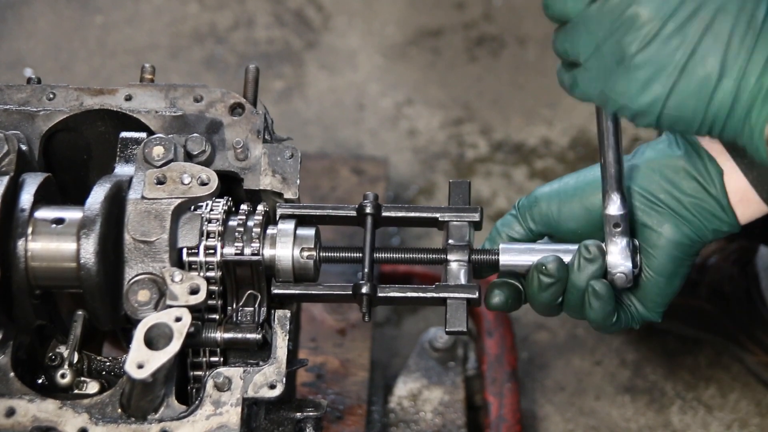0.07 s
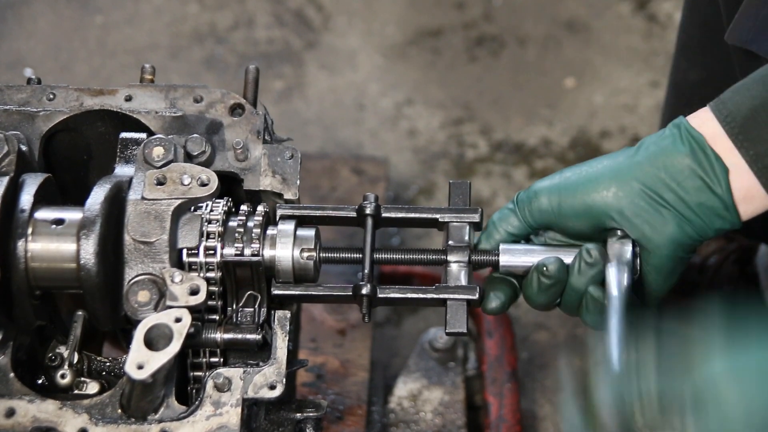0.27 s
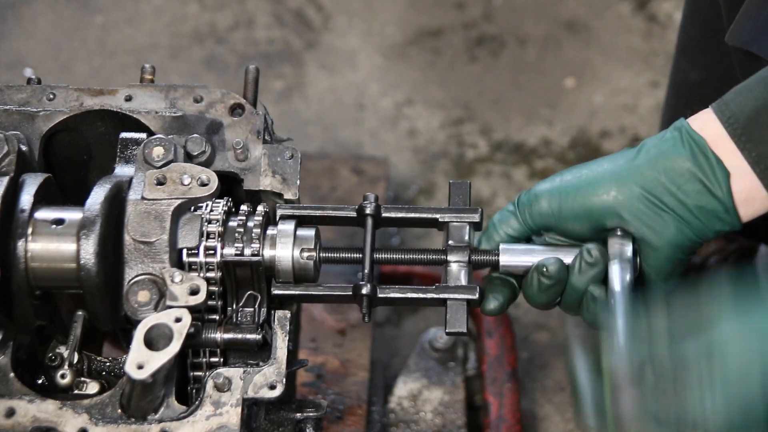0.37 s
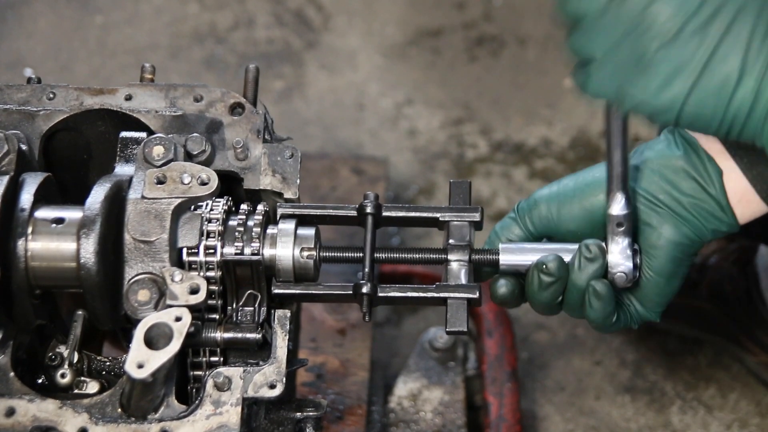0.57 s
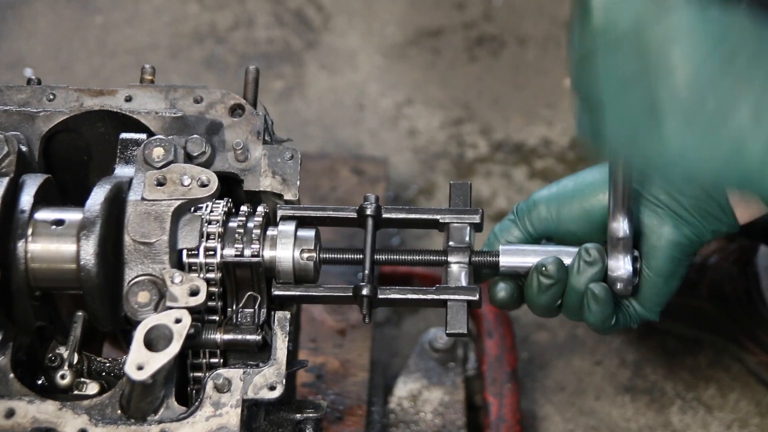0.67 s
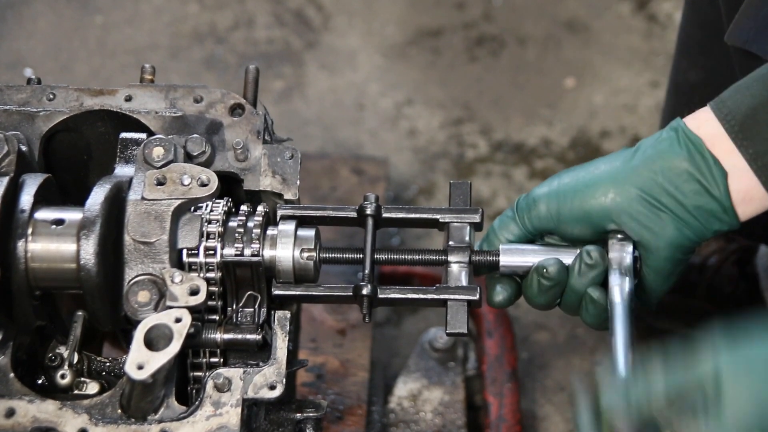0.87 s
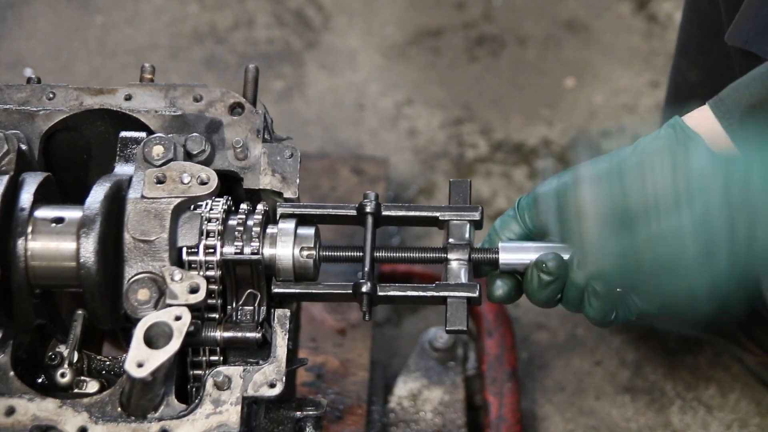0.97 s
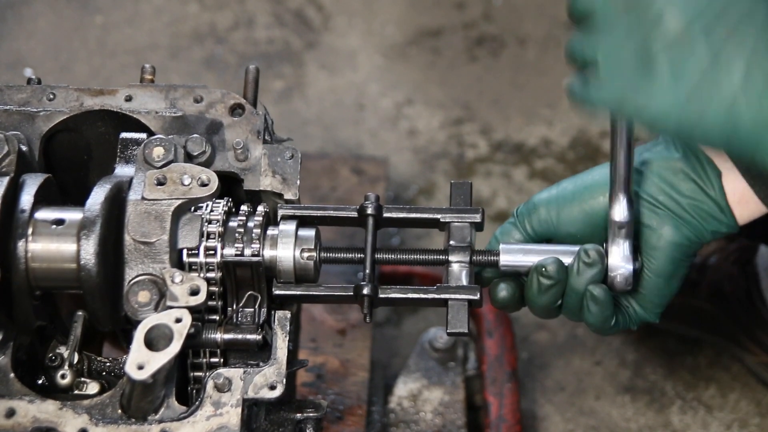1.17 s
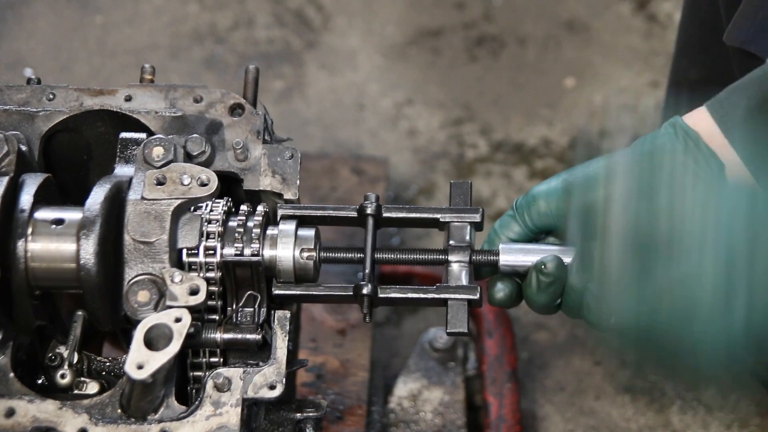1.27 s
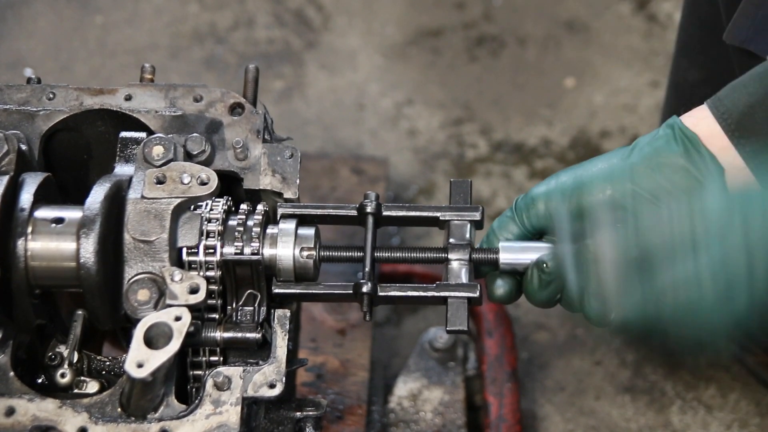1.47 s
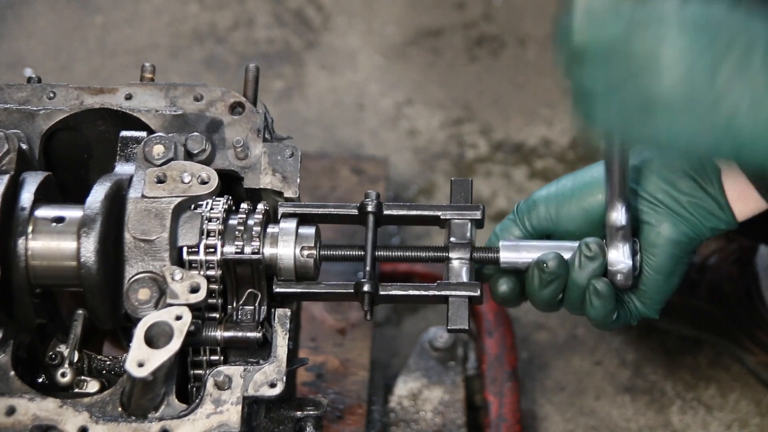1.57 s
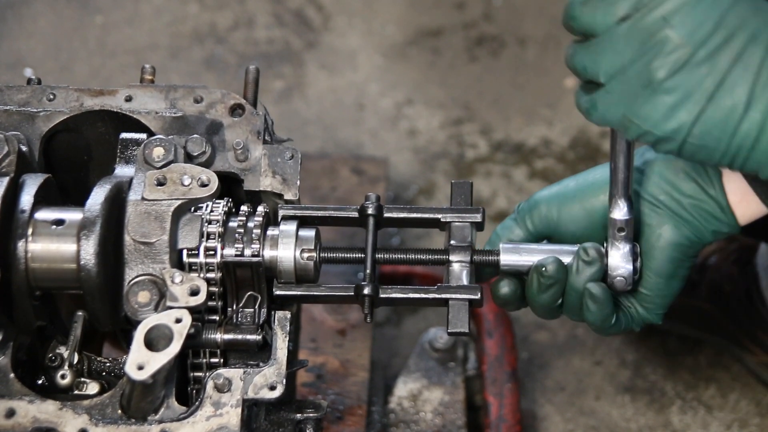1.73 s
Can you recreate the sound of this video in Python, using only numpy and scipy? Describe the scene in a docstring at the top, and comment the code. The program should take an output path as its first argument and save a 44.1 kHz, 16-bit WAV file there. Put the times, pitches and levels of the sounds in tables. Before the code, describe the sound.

Ratchet wrench clicking close up, three short rapid runs with faint rustling between them.

```python
"""A workshop, close up: a ratchet wrench turns the screw of a puller.
On each back stroke the pawl snaps over a row of teeth, ringing the steel head and handle, and each
click overloads the microphone with a low thump. On each drive stroke the slack knocks out and glove
and thread rustle. Faint metal ticks fall in between. The room rings briefly over a low hum and whine."""
import sys
import numpy as np
from scipy import signal
from scipy.fft import rfft, irfft
from scipy.io import wavfile
from scipy.ndimage import uniform_filter1d

SR = 44100
rng = np.random.default_rng(int(sys.argv[2]) if len(sys.argv) > 2 else 0)


def output_pcm(signal):
    """Save a mono or channel-first signal as 16-bit PCM at the path in sys.argv[1].

    Samples are clipped to [-1, 1] before scaling.
    """
    pcm = np.clip(np.atleast_2d(signal).T, -1, 1) * 32767
    wavfile.write(sys.argv[1], SR, np.round(pcm).astype(np.int16))


N = 79380

# tone of the workshop air (frequency [Hz], level [dB])
HUM_COLOUR = [(24, -33), (40, 1.5), (124, -3.5), (215, -5), (455, -6), (663, -12.5), (965, -7),
              (1480, -21.5), (2910, -28), (3300, -35.5), (16000, -38)]
# fader curve of the glove and thread (time [s], level [dB])
RUSTLE_FADER = [(0, -51), (.1, -55), (.14, -59.5), (.2, -54.5), (.4, -53), (.62, -51), (.67, -59),
                (0.722, -52.5), (.95, -55.5), (1.15, -49.5), (1.191, -61.5), (1.252, -49), (1.5, -51.5),
                (1.66, -51.5), (1.71, -62.5), (1.8, -67)]
# tone of the rustle (frequency [Hz], level [dB])
RUSTLE_TONE = [(35, -44), (60, -0.5), (636, -2), (803, -7.5), (946, -13), (1140, -9), (1280, -9.5),
               (2900, -15.5), (9350, -16), (16000, -32.5)]
# slack being taken up (time [s], level [dB], upper mode trim [dB])
KNOCK_CUES = [(.022, -48.5, -15.5), (0.433, -49, 14), (0.451, -45, -12), (0.548, -52.5, -11),
              (0.96, -47.5, 4.5), (0.97, -46, 2.5), (1.054, -50, -13.5), (1.251, -49, 1), (1.478, -46, -2),
              (1.495, -50.5, -13)]
# body of a knock (frequency [Hz], level [dB], T60 [s])
KNOCK_MODES = [(247, -4, 0.1), (328.5, 1.5, .09), (426, -6, 0.042), (836, 1.5, 0.059), (1047, 0.5, 0.031),
               (1255, 4, 0.021), (1470, -8.5, 0.023)]
# faint ticks of metal (time [s], level [dB], pitch [Hz])
TICK_CUES = [(0.185, -63, 3250), (0.711, -55, 3100), (1.0445, -51, 6580), (1.2526, -57, 6260)]
# one click per tooth (time [s], level [dB], low ring trim [dB], mic thump trim [dB],
# handle trim [dB], mic thump swing-back [ms])
CLICK_CUES = [(0.2225, -21, -9, -13, -15.5, 8), (0.2336, -16, -9, -16, -24, 3.7),
              (0.244, -16, -6.5, -26, -24, 1.2), (0.2536, -19, -1, -23, -24, 1.3),
              (0.2636, -14.5, -14.5, -8, -16, 1.4), (0.273, -16.5, -8, -14, -25, 2),
              (0.2822, -11, -7, -10.5, -34, 2.5), (0.2917, -11.5, -8, -8.5, -29, 1.5),
              (0.3005, -14.5, -12, -7, -21, 0.97), (0.3088, -14.5, -8.5, -8, -23, 1.5),
              (0.3177, -14.5, -4, -11, -31, 1.3), (0.3276, -18, -4, -6, -23, 0.83),
              (0.3383, -15, -5.5, -12.5, -24, 1.2), (0.3513, -17, -5, -8.5, -18, 1.5),
              (0.3917, -17, -4, -2, -22, 2.8), (0.7471, -21.5, -10, -8.5, -20, 5),
              (0.7583, -18, -14, -11.5, -16, 1.5), (0.769, -17.5, -5, -29, -16, 3.0),
              (0.7797, -17, -3, -15, -14, 2.6), (0.7895, -19, -3.5, -7.5, -15, 0.7),
              (0.7994, -16.5, -0.5, -3.5, -19, 0.69), (0.8088, -13.5, -8, -5, -15, 0.63),
              (0.8178, -18, -8, -7.5, -6, 1.3), (0.8273, -15.5, -13, -5.5, -9, 1.1),
              (0.8364, -16, -3.5, -5, -19, 0.9), (0.8455, -17.5, -5, -4, -14, 1.0),
              (0.8552, -13.5, -12, -6, -18.5, 1.3), (0.8657, -21, 2, 0, -13, 1.1),
              (0.8777, -18, -3, -2.5, -19, 0.81), (0.9062, -19.5, 1, -4.5, -17.5, 1.7),
              (1.2758, -23.5, -6.5, -4.5, -13, 1.3), (1.2864, -24.5, -2.5, -5, -8, 1.3),
              (1.2958, -22, -1, -20, -22, 0.92), (1.305, -25.5, 2, -15.5, -13, 0.64),
              (1.3139, -24.5, 5, -6.5, -7, 1.5), (1.3223, -23.5, 3, -5.5, -12, 0.83),
              (1.3306, -22, 0, -1, -8, 1.1), (1.3385, -19, -1.5, 0, -18, 0.72),
              (1.3465, -22.5, 5, -3, -19, 1.2), (1.3543, -18.5, -4, -9, -12, 1.2),
              (1.3623, -17, -5.5, -12, -15, 1.2), (1.3703, -20, -2, -12, -13, 1.2),
              (1.3793, -17.5, -1, -11, -16.5, 4), (1.3894, -20, -3.5, -11.5, -21, 3),
              (1.4023, -21, 3, -13, -34, 3.6), (1.4395, -22.5, -2, -5, -23, 2.6)]
# resonances of the steel head (frequency [Hz], level [dB], T60 [s])
HEAD_MODES = [(1404, -11.5, 0.001), (2484, -14, 0.0019), (3554, -13, 0.002), (4420, -17.5, 0.0044),
              (5686, -12, 0.0042), (6650, -4, 0.0055), (7640, -9.5, 0.012), (8484, -9.5, 0.01),
              (9540, -4, 0.00905), (10140, -6.5, 0.021), (10380, 3.5, 0.004), (12130, -7.5, 0.021),
              (12420, -17.5, 0.0032), (14120, -13, 0.002)]
# length of the room tail (frequency [Hz], T60 [s])
ROOM_DECAY = [(300, .25), (3000, 0.3), (7000, .35), (10000, 0.3), (12500, 0.31), (15000, .15)]
# tone of the room tail (frequency [Hz], level [dB])
ROOM_TONE = [(300, -0.5), (3000, -2.5), (5000, -0.5), (7000, -0.5), (10000, 0), (12500, -2), (15000, -3.5)]

ATTACK_S, CONTACT_S = 0.0001, 0.00076  # steel on steel


def undb(db):
    """dB to gain."""
    return 10 ** (np.asarray(db) / 20)


def coloured(x, points):
    """EQ x along a (frequency [Hz], level [dB]) curve, to rms 1."""
    hz, db = np.array(points).T
    f = np.arange(len(x) // 2 + 1) * SR / len(x) + 1
    y = irfft(rfft(x) * undb(np.interp(np.log(f), np.log(hz), db)), len(x))
    return y / y.std()


def drift(rate_hz):
    """Smooth random modulation with a spread of 1."""
    hold = int(SR / rate_hz)
    steps = np.repeat(rng.standard_normal(N // hold + 1), hold)
    smooth = uniform_filter1d(uniform_filter1d(steps, hold), hold)[:N]
    return smooth / smooth.std()


def add(track, s, sound):
    """Mix sound into track from time s."""
    i = int(s * SR)
    track[i:i + len(sound)] += sound[:N - i]


def strike(hz, db, t60, attack_s=ATTACK_S, contact_s=CONTACT_S, size=2000):
    """A rough contact rings each mode as three close partials, new for every blow; starts at rms 1."""
    hz, db, t60 = (np.repeat(v, 3) for v in (hz, db, t60))
    t = np.arange(size)[:, None] / SR
    scatter, detune, phase = rng.standard_normal((3, len(hz)))
    partials = undb(db + 2 * scatter) * np.sin(2 * np.pi * hz * (1 + 0.022 * detune) * t + np.pi * phase)
    attack = np.minimum(t / attack_s, 1)
    decay = np.exp(-np.log(1000) * np.maximum(t - contact_s, 0) / t60)
    ring = (partials * attack * decay).sum(axis=1)
    return ring / np.sqrt(np.mean(ring[:int(2 * contact_s * SR)] ** 2))


def workshop_hum(air_db=-55, whine_db=-68, whine_hz=935):
    """The bed: low workshop air and a thin machine whine, both gently wavering."""
    air = undb(air_db + 2 * drift(11.83)) * coloured(rng.standard_normal(N), HUM_COLOUR)
    whine = np.sqrt(2) * np.sin(2 * np.pi * whine_hz * np.arange(N) / SR)
    return air + undb(whine_db + 2 * drift(9.9)) * whine


def glove_and_thread():
    """Rubbing on the drive stroke: noise with a fast grain and a slower flicker."""
    grain_db, flicker_db = drift(260), 2 * drift(20)
    friction = rng.standard_normal(N) * undb(grain_db + flicker_db)
    fader_db = np.interp(np.arange(N) / SR, *np.array(RUSTLE_FADER).T)
    return coloured(friction, RUSTLE_TONE) * undb(fader_db)


def slack_knocks(contact_s=0.0076, upper_hz=600):
    """The drive stroke takes up the slack: a soft, long contact gives a dull knock."""
    track = np.zeros(N)
    hz, mode_db, t60 = np.array(KNOCK_MODES).T
    for s, db, upper_db in KNOCK_CUES:
        voicing_db = mode_db + upper_db * (hz > upper_hz)
        knock = strike(hz, voicing_db, t60, attack_s=contact_s, contact_s=contact_s, size=6000)
        add(track, s, undb(db) * knock)
    return track


def metal_ticks():
    """Light touches of metal, each ringing one short mode."""
    track = np.zeros(N)
    for s, db, hz in TICK_CUES:
        add(track, s, undb(db) * strike(hz, db=0, t60=0.012, size=1000))
    return track


def pawl_clicks(split_hz=8500, bounce_s=0.003):
    """The pawl snaps over each tooth and bounces once, ringing the head; the handle rings along."""
    track = np.zeros(N)
    modes = np.array(HEAD_MODES)
    is_high = modes[:, 0] > split_hz
    for s, db, low_db, _, handle_db, _ in CLICK_CUES:
        jitter, scatter = rng.standard_normal(2)
        snap = (s, db, low_db)
        bounce = (s + bounce_s + 0.0003 * jitter, db - 6 + 2 * scatter, low_db - 4)  # softer, thinner
        for hit_s, hit_db, low_trim_db in (snap, bounce):
            sparkle = strike(*modes[is_high].T)
            body = undb(low_trim_db) * strike(*modes[~is_high].T)
            add(track, hit_s, undb(hit_db) * (sparkle + body))
        handle = strike(hz=4866, db=0, t60=0.013, attack_s=CONTACT_S)
        add(track, s, undb(db + handle_db) * handle)
    return track


def mic_overload_thumps(pulse_s=0.001, rebound=0.98, low_cut_hz=34.8):
    """A low thump as each click overloads the mic: a half-sine pulse that swings back and dies away."""
    track = np.zeros(N)
    t = np.arange(1000) / SR
    pulse = -np.sin(np.pi * t / pulse_s)
    for s, db, _, thump_db, _, swing_ms in CLICK_CUES:
        swing_back = rebound * np.exp(-(t - pulse_s) / (swing_ms * 1e-3))
        add(track, s, undb(db + thump_db) * np.where(t < pulse_s, pulse, swing_back))
    return signal.sosfilt(signal.butter(2, low_cut_hz, "high", fs=SR, output="sos"), track)


def room(send, wet_db=-14, predelay_s=0.0025):
    """A short, diffuse workshop tail whose tone and decay depend on frequency."""
    f, t, noise = signal.stft(rng.standard_normal(SR // 2), SR, nperseg=256)
    t60 = np.interp(f, *np.array(ROOM_DECAY).T)[:, None]
    tone = undb(np.interp(f, *np.array(ROOM_TONE).T))[:, None]
    _, tail = signal.istft(noise * tone * np.exp(-np.log(1000) * t / t60), SR, nperseg=256)
    response = np.r_[np.zeros(int(predelay_s * SR)), tail / np.sqrt(np.sum(tail ** 2))]
    return undb(wet_db) * signal.fftconvolve(send, response)[:N]


def scene():
    """Mono mix: knocks, ticks and clicks feed the room; hum, rustle and mic thumps stay dry."""
    bed = workshop_hum() + glove_and_thread()
    hits = slack_knocks() + metal_ticks() + pawl_clicks()
    return (bed + hits + mic_overload_thumps() + room(hits))[None]


def record(dry):
    """Soft saturation rounds the loudest peaks, then a steep filter cuts the top."""
    ceiling, top_hz = 0.55, 15900
    rounded = ceiling * np.tanh(dry / ceiling)
    return signal.sosfilt(signal.ellip(10, 0.2, 70, top_hz, fs=SR, output="sos"), rounded)


dry = scene()
out = record(dry)
output_pcm(out)
```